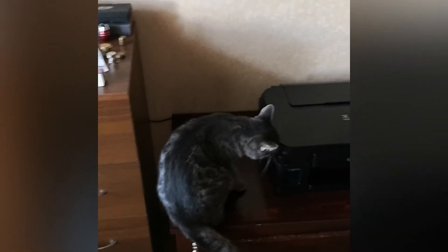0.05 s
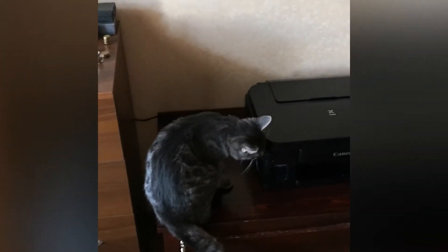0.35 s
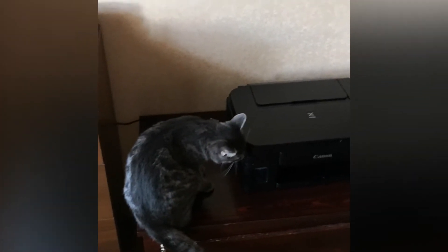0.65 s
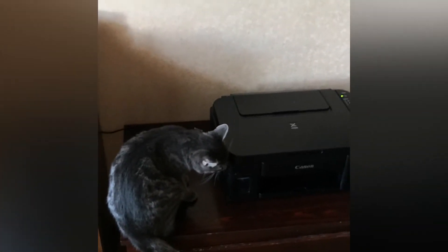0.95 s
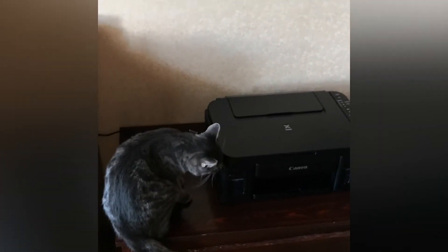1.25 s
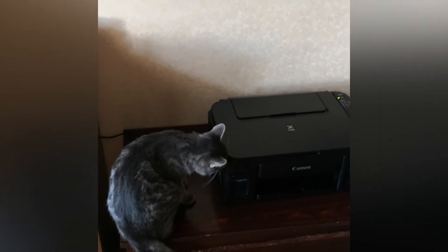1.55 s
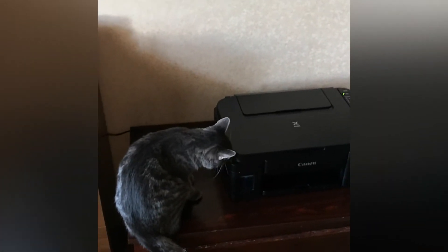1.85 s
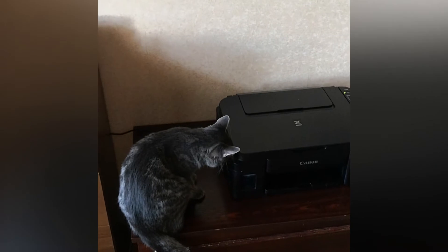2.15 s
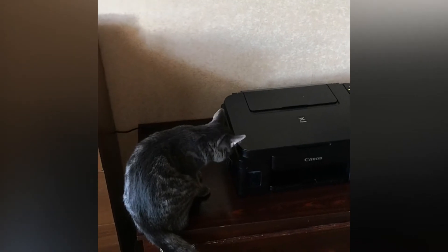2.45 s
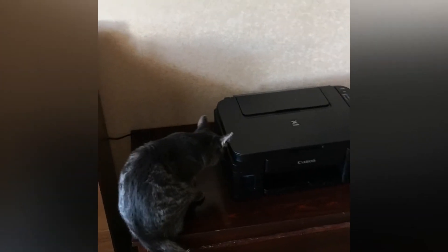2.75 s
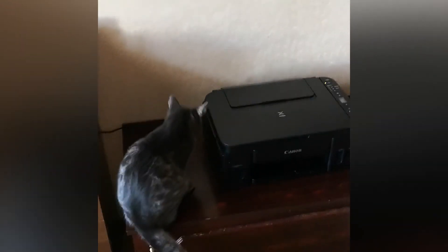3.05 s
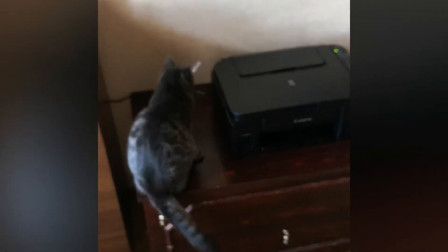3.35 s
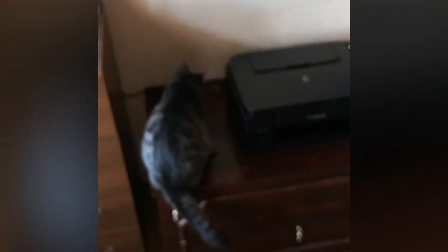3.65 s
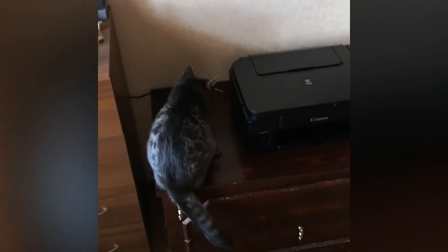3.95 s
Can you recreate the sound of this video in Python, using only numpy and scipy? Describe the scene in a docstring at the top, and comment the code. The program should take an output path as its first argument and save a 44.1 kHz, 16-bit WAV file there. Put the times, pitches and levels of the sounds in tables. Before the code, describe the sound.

In a quiet room with soft hiss, a printer's feed motor whirrs briefly and cuts out. A plastic click follows, then a short groaning scrape ending in a clattering clunk, and a low hum carries on.

```python
"""A small quiet room, a desktop inkjet printer on a wooden table. Hiss and weak electrical hum underneath.
The feed motor whines through plastic gears, thrums the casing and stops; a catch clicks.
The mechanism then scrapes and groans into its stop: a clunk of casing, frame and plastic modes.
It runs on with a faint low drone."""
import sys
import numpy as np
from scipy import signal
from scipy.fft import rfft, irfft, next_fast_len
from scipy.io import wavfile
from scipy.ndimage import map_coordinates

SR = 44100
rng = np.random.default_rng(int(sys.argv[2]) if len(sys.argv) > 2 else 0)


def transcribe(signal):
    """Save signal, clipped to [-1, 1], as a 16-bit WAV file at the path in sys.argv[1]."""
    frames = np.atleast_2d(signal).T
    limited = np.clip(frames, -1, 1)
    pcm = np.round(limited * 32767).astype(np.int16)
    wavfile.write(sys.argv[1], SR, pcm)


N = 176400
HIT_N = SR // 2
SHAFT_HZ, WHEEL_HZ, MOTOR_OFF_S = 52.5, 5.7, 1.267
ATTACK_S = 0.0011

# noise spectra: f/Hz, relative level/dB
HISS_SPECTRUM = [(20, -5.5), (30, -21), (70, -18.5), (105, -4), (140, -13.5), (175, -15), (215, -12.5),
                 (260, -11), (420, -9), (540, -15.5), (680, -15), (900, -11), (1250, -10), (1480, -13),
                 (1750, -9), (2200, -13), (2700, -13), (3100, -18), (4500, -21.5), (6500, -24),
                 (7800, -28.5), (9000, -28), (11900, -28.5), (12600, -47), (15500, -52)]
RUB_SPECTRUM = [(88, -28), (150, -9.5), (242, -6.5), (283, -12.5), (498, -21), (1930, -13.5), (2860, -22.5),
                (3280, -31), (6610, -41), (9000, -65), (11700, -84), (19800, -120)]
RATTLE_SPECTRUM = [(35, -26), (70, -20.5), (141, -15), (200, -13.5), (302, -17.5), (551, -20), (780, -13.5),
                   (940, -14.5), (1150, -19), (1480, -19), (1680, -11.5), (2120, -12.5), (2300, -17.5),
                   (2560, -15), (2950, -22.5), (3200, -13.5), (3420, -17.5), (3600, -25.5), (4250, -26.5),
                   (5450, -32), (5870, -24), (6200, -34), (6420, -25.5), (6750, -30), (7150, -35),
                   (7900, -35.5), (8700, -42.5), (11000, -38.5), (15000, -39)]
CATCH_SPECTRUM = [(100, -33), (210, 1), (330, -10), (600, -10.5), (1000, -4), (1350, -6.5), (1900, -0.5),
                  (2150, -4), (2350, 0), (2800, -11), (3400, -3), (3900, -11.5), (4250, -13), (4900, -20),
                  (7500, -25), (9000, -36), (15000, -38)]
SCRAPE_SPECTRUM = [(80, -12), (180, 5), (300, -14), (580, -9), (800, -1), (1400, -6.5), (2000, -7.5),
                   (3000, -19.5), (8000, -28), (15000, -53)]
KNOCK_SPECTRUM = [(120, -20), (200, -8), (330, -11), (470, -2), (590, -12.5), (780, -2.5), (1030, -7),
                  (1180, -9.5), (1400, -3.5), (1700, -12), (2030, -5.5), (2450, -16), (3000, -27),
                  (3600, -21), (4050, -9), (4350, -24), (4650, -10), (5100, -19), (7900, -20), (8700, -29),
                  (10000, -39.5), (11400, -23.5), (15000, -42)]
CLICK_SPECTRUM = [(180, -24), (300, -6.5), (466, -9), (580, -19), (753, -9.5), (1110, -13.5), (1460, -5.5),
                  (1690, -8.5), (2490, -2.5), (3060, -10.5), (4300, -11.5), (5230, -18), (8000, -29),
                  (10400, -54), (17600, -120)]
# modes: f/Hz, relative level/dB, T60/s
CASING_MODES = [(77, -16, 0.51), (111.3, -2, 0.38), (147.5, -7, 0.34), (173.9, -1, 0.54),
                (198.2, -1.5, 0.56), (234.4, -3, 0.57), (270, -7, 0.35), (294, -3, 0.4), (353, -9, 0.23),
                (471.4, -6.5, 0.28)]
FRAME_MODES = [(690, -7, 0.33), (785, -6, 0.22), (874, -9, 0.25), (1033, -5.5, 0.32), (1378, -7, 0.24),
               (1990, -19, .2), (2346, -15, 0.27)]
PLASTIC_MODES = [(1055, -4, 0.14), (1870, -2.5, 0.17), (2054, 0.5, .1), (2315, -1, 0.19), (2480, -4.5, .24),
                 (2790, -8, .2), (3240, -5, 0.18)]
# swells: t/s, gain/dB
DRONE_SWELL = [(3.2, 2), (3.3, 0.5), (3.459, 0.5), (3.57, -4.5), (3.65, 0.5), (3.75, 1), (4, -1)]
GEAR_SWELL = [(0.34, -2), (0.41, 1.5), (0.52, -1), (0.94, -1), (1.0, 0.5), (1.07, -0.5), (1.27, -2.5)]
# contacts: t/s, level/dB
TICK_HITS = [(3.655, -60.5)]
CATCH_HITS = [(1.7507, -47), (1.7671, -50.5), (1.786, -53.5)]
# steady partials: f/Hz, level/dB
HUM_TONES = [(103, -75), (209.8, -74), (527.6, -83), (834.4, -83.5), (936.7, -77), (1055, -83), (1669, -83),
             (1873, -81.5)]
THRUM_NEIGHBOURS = [(226, -69.5), (251, -64.5)]

DRONE_BANDS = [(110, 34, -75.5), (183, 15, -65.5), (244.3, 28, -64.5), (403, 86, -73.5), (787, 40, -77),
               (1580, 35, -73.5)]  # casing resonances: f/Hz, width/Hz, level/dB
GEAR_LOAD = [(0, 0.19), (.3, 0.12), (.55, 0.27), (.76, 1.06), (.88, 0.74), (1.27, 0.79)]  # load on the gears: t/s, load/full load
GEAR_ORDERS = [(2, -71, 3), (4.08, -60.5, -5), (9.05, -72.5, -7), (12, -81, 3), (13, -73.5, 8.5),
               (16, -65.5, 8.5), (17, -84, 19), (18, -87, 18), (20, -71, 11), (23, -70, -1), (24, -76.5, 2),
               (28, -66.5, -11), (36, -61, 2.5), (40, -69.5, 3.5), (41, -76, 5), (46, -79, 7),
               (47, -65, -5), (48, -63, -18), (49, -61.5, -18), (58, -82, 7), (59, -84, 0), (60, -65, 2.5),
               (63.3, -70, -15), (63.4, -78.5, 10.5), (65, -63.5, -12.5)]  # whine: shaft order (rounded in use), level/dB, full-load change/dB
TOOTH_PULSES = [(1, 0.11), (3, 0.085), (6, 0.12), (8, 0.15)]  # rattle modulation: shaft order, depth/Np
GROAN_PATH = [(2.904, 192, -66), (2.921, 188.7, -47.5), (2.936, 188.4, -60), (2.95, 183.8, -43),
              (2.99, 173, -40.5), (3.02, 166.5, -47.5), (3.049, 136, -51.5), (3.1, 120, -66)]  # straining drive: t/s, f/Hz, level/dB
GROAN_HARMONICS = [(1, -1), (2, -26), (4, -17), (5, -18)]  # its partials: harmonic number, relative level/dB
CLUNK_HITS = [(2.906, -57.5, -60, -62.5), (2.932, -49.5, -49.5, -59), (2.966, -48, -48.5, -60),
              (2.978, -54, -47.5, -66), (2.992, -46.5, -35.5, -42), (3.016, -48, -44.5, -56),
              (3.0502, -48.5, -52.5, -38.5), (3.076, -49.5, -61, -43)]  # contacts at the stop: t/s, thud/dB, knock/dB, click/dB
BAND_DECAY = [(200, 0.6), (1000, 0.37), (2500, 0.26), (5000, 0.22), (12000, 0.33)]  # casing plus room: f/Hz, T60/s
COHERENCE = [(60, .995), (150, .95), (200, 0.83), (270, 0.51), (500, 0), (1000, 0.021), (2000, 0.11),
             (4000, 0), (10000, 0.011)]  # noise field: f/Hz, left-right correlation
PORT_BALANCE = [(300, 0.4), (1000, 0.1), (3000, 1.5), (5000, 3), (5600, 5), (6400, 6), (7000, 7),
                (7700, -8), (8200, -7.5), (8600, 1)]  # microphone colour: f/Hz, left minus right/dB


def amp(db):
    """dB to gain."""
    return 10 ** (np.asarray(db) / 20)


def unit(x):
    """Scale to rms 1."""
    return x / np.sqrt(np.mean(x ** 2) + 1e-20)


def along(points, hz):
    """Interpolate on a log frequency axis."""
    f, v = np.transpose(points)
    return np.interp(np.log(hz + 1), np.log(f + 1), v)


def clock():
    """Sample times in s."""
    return np.arange(N) / SR


def curve(points):
    """Interpolate over time."""
    return np.interp(clock(), *np.transpose(points))


def wobble(rate_hz):
    """Smooth random curve, rate_hz knots a second."""
    knots = rng.standard_normal(int(N * rate_hz / SR) + 4)
    return map_coordinates(knots, [clock() * rate_hz], mode="nearest")


def filtered(x, response):
    """Zero-phase filter, gain response(hz)."""
    m = next_fast_len(x.shape[-1] + SR // 2)
    return irfft(rfft(x, m) * response(np.fft.rfftfreq(m, 1 / SR)), m)[..., :x.shape[-1]]


def noise(gain, size=N):
    """Stereo noise, rms 1: coherent bass, diffuse treble."""
    def mid_side(hz):
        angle = np.arccos(np.clip(along(COHERENCE, hz), -1, 1)) / 2
        return gain(hz) * np.array([np.cos(angle), np.sin(angle)])
    mid, side = filtered(rng.standard_normal((2, size)), mid_side)
    return unit(np.array([mid + side, mid - side]))


def coloured(spectrum, size=N):
    """Noise with a tabulated spectrum."""
    return noise(lambda hz: amp(along(spectrum, hz)), size)


def band(centre_hz, width_hz):
    """Noise in a steep-sided resonance."""
    return noise(lambda hz: 1 / (1 + ((hz - centre_hz) / width_hz * 2) ** 4))


def tone(hz, rms_db, drift_rad, drift_hz):
    """Sine with wandering phase."""
    return np.sqrt(2) * amp(rms_db) * np.sin(2 * np.pi * hz * clock() + drift_rad * wobble(drift_hz))


def pan(db):
    """Channel gains, left minus right = db."""
    return amp(np.array([[db], [-db]]) / 2)


def add(out, start_s, x):
    """Mix x into out."""
    i = round(start_s * SR)
    out[:, i:i + x.shape[1]] += x[:, :N - i]


def ring(modes, attack_s=ATTACK_S):
    """Damped modes, varied per blow and per ear."""
    t, out = np.arange(HIT_N) / SR, 0
    for hz, db, t60_s in modes:
        phase = rng.uniform(0, 2 * np.pi) + np.array([[1], [-1]]) * rng.normal() * min(hz / 1000, 0.7)
        decay = amp(db + rng.normal(0, 1) - 60 * t / t60_s)
        detuned_hz = hz * (1 + rng.normal(0, 0.0064))
        out = out + decay * np.sin(2 * np.pi * detuned_hz * t + phase)
    return out * (1 - np.exp(-t / attack_s))


def burst(spectrum):
    """Dense plastic ringing: short crack, then per-band decay."""
    hz, frame_s, bins = signal.stft(coloured(spectrum, HIT_N), SR, nperseg=256)
    decay = amp(-60 * frame_s / along(BAND_DECAY, hz)[:, None])
    ringing = signal.istft(bins * decay, SR)[1][:, :HIT_N]
    t = np.arange(HIT_N) / SR
    crack = 1 + 0.51 * np.exp(-t / 0.0032)
    return ringing * crack * (1 - np.exp(-t / ATTACK_S))


def room():
    """Steady hiss, wavering electrical hum."""
    hum = sum(tone(hz, db + 1.4 * wobble(6.8), drift_rad=0.5, drift_hz=7.7) for hz, db in HUM_TONES)
    hiss = amp(-61.5 + 0.3 * wobble(5.44)) * coloured(HISS_SPECTRUM)
    return hum + hiss * pan(-1.9)


def drone(start_s=3.03, whirr_start_s=3.22, rise_s=0.16):
    """Slow run after the clunk: casing hum and soft rub, then gear whirr."""
    rise = lambda s: np.clip((clock() - s) / rise_s, 0, 1)
    hum = amp(curve(DRONE_SWELL)) * sum(amp(db) * band(hz, width) for hz, width, db in DRONE_BANDS)
    rub = amp(-61.5 + 1.2 * wobble(10)) * coloured(RUB_SPECTRUM)
    whirr = amp(-74) * band(3250, width_hz=220)
    return (hum + rub) * rise(start_s) + whirr * rise(whirr_start_s)


def tick():
    """The running mechanism catches lightly."""
    out = np.zeros((2, N))
    for s, db in TICK_HITS:
        add(out, s, amp(db) * burst(CLICK_SPECTRUM))
    return out


def shudder(peak_s=1.29, rise_db_per_s=70, fade_db_per_s=35):
    """Deep rumble, peaking as the motor stops."""
    late_s = clock() - peak_s
    return amp(-64 + np.minimum(rise_db_per_s * late_s, -fade_db_per_s * late_s)) * band(33, width_hz=96)


def run_down(t60_s):
    """Decay after motor off."""
    return amp(-60 * np.maximum(clock() - MOTOR_OFF_S, 0) / t60_s)


def casing_thrum():
    """Motor-driven casing tone: swells once per wheel turn, beats with its neighbours."""
    wheel_db = 5 * np.cos(2 * np.pi * WHEEL_HZ * (clock() - 0.05))
    swell_db = wheel_db + 1.2 * wobble(20.5) + 1.2 * wobble(70)
    thrum = tone(198.8, -57.5 + swell_db, drift_rad=0.24, drift_hz=24.95)
    neighbours = sum(tone(hz, db + 2.5 * wobble(13.5), drift_rad=0.56, drift_hz=11.7)
                     for hz, db in THRUM_NEIGHBOURS)
    boom = amp(-62.5) * band(229, width_hz=89)
    return (thrum + neighbours + boom) * run_down(t60_s=0.38)


def feed_gears():
    """Whine and tooth rattle locked to one shaft; a slack gear chatters until loaded."""
    load, swell_db = curve(GEAR_LOAD), curve(GEAR_SWELL)
    shaft_rad = 2 * np.pi * np.cumsum(SHAFT_HZ * (1 + 0.0013 * wobble(24.96))) / SR
    whine = np.zeros((2, N))
    for order, db, load_db in GEAR_ORDERS:
        phase = np.round(order) * shaft_rad + rng.uniform(0, 2 * np.pi)
        side = 0.7 * min(order / 10, 1) * np.cos(phase + 0.73 * wobble(2.8))
        level = np.sqrt(2) * amp(db + swell_db + load_db * load + 2 * wobble(16.1))
        whine += level * np.array([np.sin(phase) + side, np.sin(phase) - side])
    mesh = sum(depth * np.cos(k * shaft_rad + rng.uniform(0, 2 * np.pi)) for k, depth in TOOTH_PULSES)
    rattle = coloured(RATTLE_SPECTRUM) * unit(np.exp(mesh))
    rattle *= amp(-52 + load + 0.19 * swell_db + 0.6 * wobble(39.9))
    chatter = band(2580, width_hz=130) * amp(-60.5 - 15 * load + swell_db)
    return (whine + rattle + chatter) * pan(0.9) * run_down(t60_s=0.22)


def catch(thud_s=1.765):
    """A plastic catch snaps over, rebounds, shakes the casing."""
    out = np.zeros((2, N))
    for s, db in CATCH_HITS:
        add(out, s, amp(db) * (burst(CATCH_SPECTRUM) + amp(-4) * ring(PLASTIC_MODES)) * pan(-0.5))
    add(out, thud_s, amp(-53) * ring(CASING_MODES, attack_s=0.015))
    return out


def lurch(start_s=2.89, impact_s=2.995, rise_db_per_s=322, fade_db_per_s=400):
    """The sliding mechanism scrapes ever louder up to its stop."""
    late_s = clock() - impact_s
    db = -38.5 + np.minimum(rise_db_per_s * late_s, -fade_db_per_s * late_s)
    return amp(db + 1.3 * wobble(200)) * coloured(SCRAPE_SPECTRUM) * (clock() > start_s)


def groan():
    """The drive strains against the stop: a low tone swells, its pitch sags."""
    t = clock()
    s, hz, db = np.transpose(GROAN_PATH)
    phase = 2 * np.pi * np.cumsum(np.interp(t, s, hz) * (1 + 0.0193 * wobble(120))) / SR
    partials = sum(amp(partial_db) * np.sin(k * phase + rng.uniform(0, 2 * np.pi))
                   for k, partial_db in GROAN_HARMONICS)
    envelope = np.interp(t, s, amp(db), left=0, right=0) * amp(1.6 * wobble(110))
    return np.sqrt(2) * envelope * partials


def clunk(pawl_s=3.052, pawl_t60_s=0.045):
    """Each contact thuds the casing, knocks the frame, clicks the plastic; a pawl snaps in."""
    out, t = np.zeros((2, N)), np.arange(HIT_N) / SR
    for s, thud_db, knock_db, click_db in CLUNK_HITS:
        add(out, s, amp(thud_db) * ring(CASING_MODES, attack_s=0.01))
        add(out, s, amp(knock_db) * (burst(KNOCK_SPECTRUM) + amp(-3) * ring(FRAME_MODES)))
        add(out, s, amp(click_db) * (burst(CLICK_SPECTRUM) + amp(-4) * ring(PLASTIC_MODES)))
    add(out, pawl_s, amp(-32 - 60 * t / pawl_t60_s) * burst(CLICK_SPECTRUM))
    return out


def scene():
    """Printer plus room."""
    feed = feed_gears() + casing_thrum() + shudder()
    return feed + catch() + lurch() + groan() + clunk() + drone() + tick() + room()


def record(dry):
    """Microphone: per-port colour, treble shelf, band limit."""
    shelf_hz, shelf_db, limit_hz = 8070, -11.5, 15500
    shelf = lambda hz: amp(shelf_db * (1 + np.tanh((hz - shelf_hz) / 150)) / 2)
    ports = lambda hz: amp(along(PORT_BALANCE, hz) * np.array([[1], [-1]]) / 2)
    return filtered(dry, lambda hz: ports(hz) * shelf(hz) * (hz < limit_hz))


dry = scene()
out = record(dry)
transcribe(out)
```